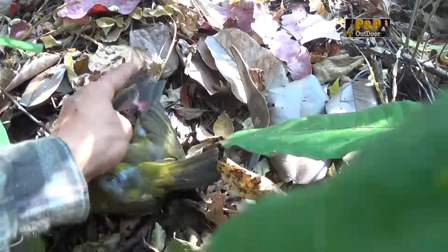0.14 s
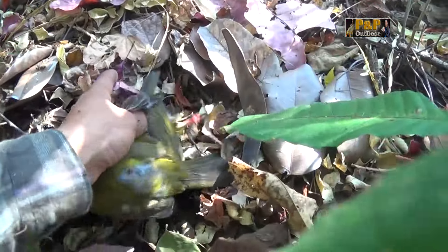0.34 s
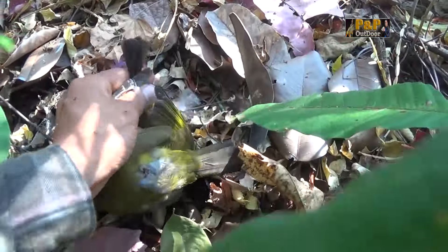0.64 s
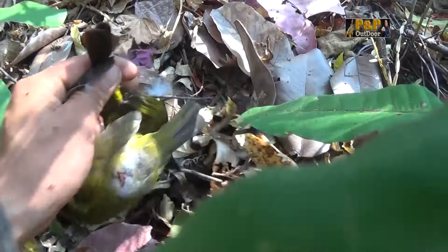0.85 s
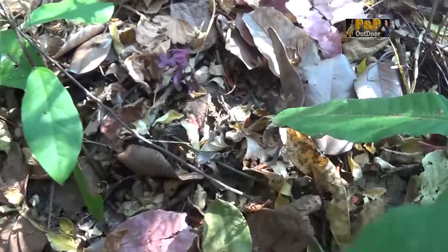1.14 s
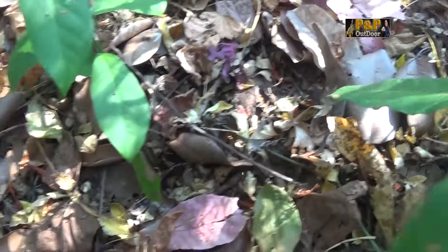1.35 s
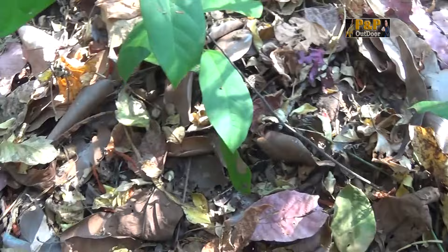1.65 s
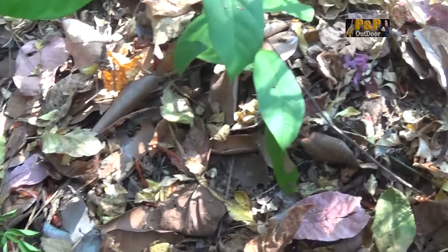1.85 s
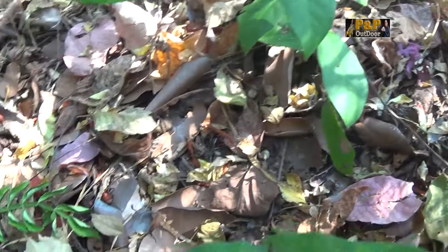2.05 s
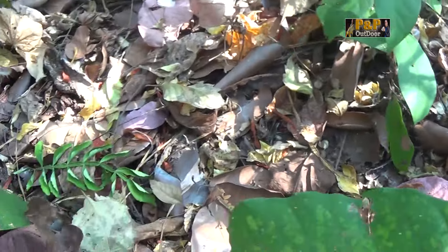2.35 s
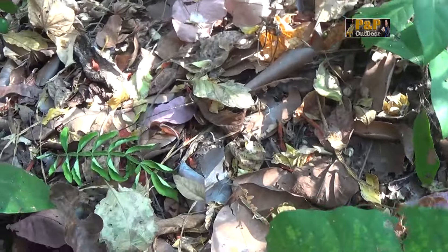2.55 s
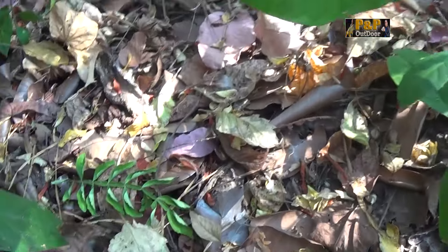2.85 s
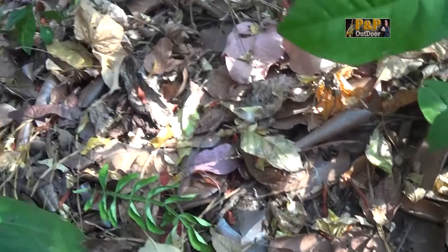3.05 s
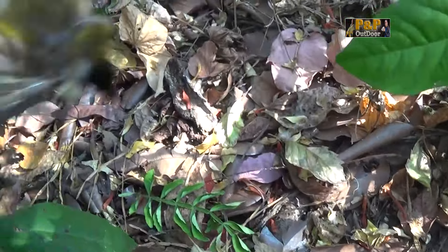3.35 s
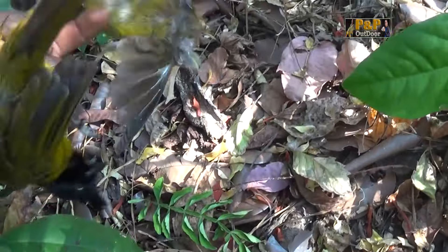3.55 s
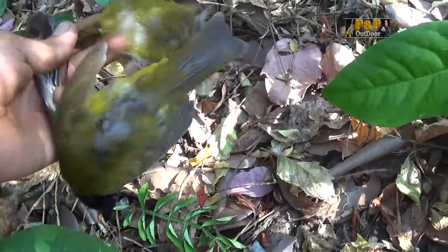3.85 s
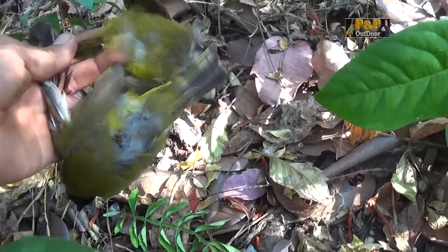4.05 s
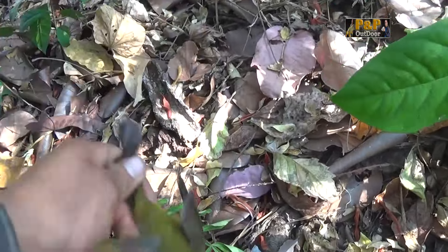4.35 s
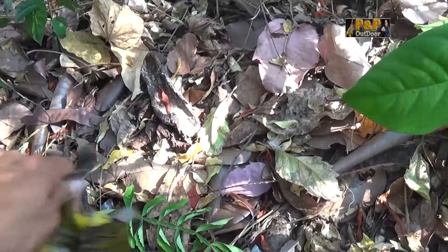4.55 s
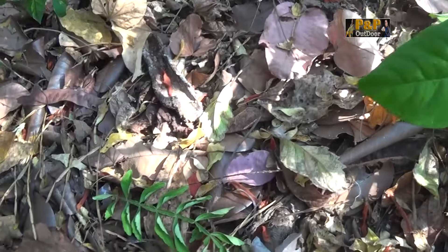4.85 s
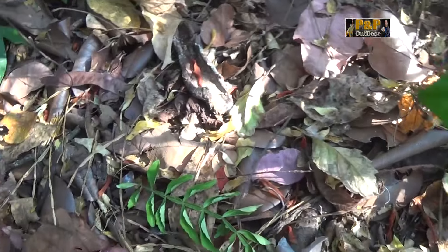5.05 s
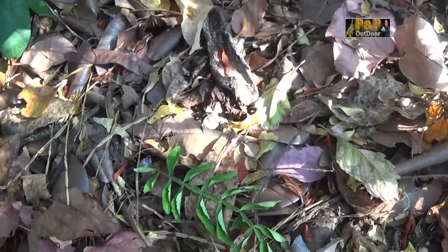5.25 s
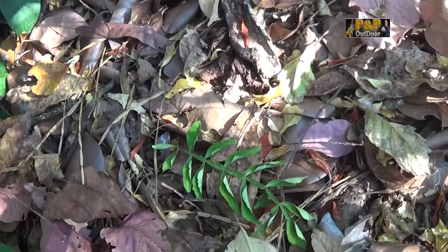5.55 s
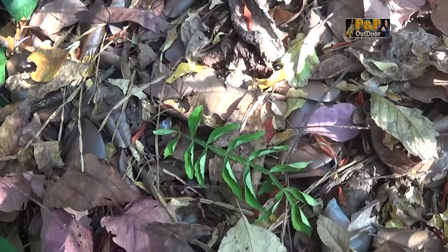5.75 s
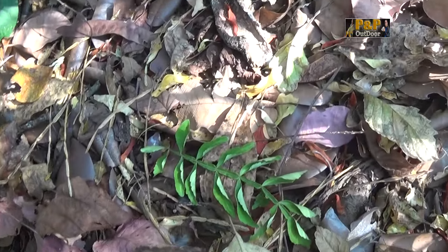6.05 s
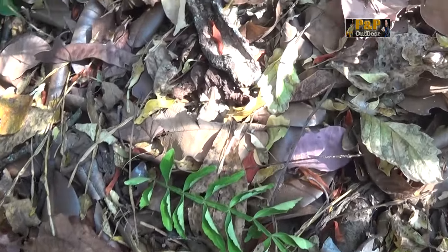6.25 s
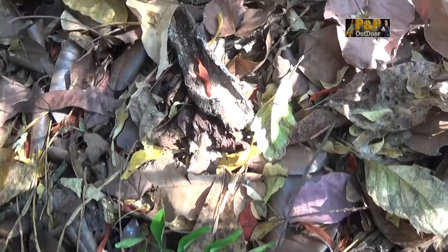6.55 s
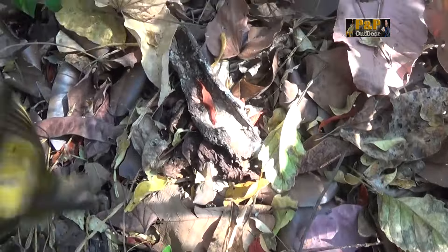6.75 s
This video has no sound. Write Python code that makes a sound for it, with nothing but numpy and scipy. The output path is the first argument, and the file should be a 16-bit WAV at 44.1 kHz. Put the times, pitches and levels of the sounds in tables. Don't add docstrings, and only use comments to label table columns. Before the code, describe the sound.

Dry leaves crackle and snap in irregular bursts close by, with early low thumps of fingers rubbing the camera, over a steady high cicada drone.

```python
import sys
import numpy as np
from scipy import signal
from scipy.fft import rfft, irfft
from scipy.io import wavfile
from scipy.ndimage import uniform_filter1d

SR = 44100
rng = np.random.default_rng(int(sys.argv[2]) if len(sys.argv) > 2 else 0)


def dump_mix(stems):
    frames = np.atleast_2d(stems).T
    limited = np.clip(frames, -1, 1)
    pcm = np.round(limited * 32767).astype(np.int16)
    wavfile.write(sys.argv[1], SR, pcm)


def makeup_ratio(level_db):
    decades = np.asarray(level_db, float) / 20
    return 10 ** decades


N = 304290
HZ, TIME = np.fft.rfftfreq(N, 1 / SR), np.arange(N) / SR

# time_s, left_minus_right_db
PLACE = [
    (0.0, 0.5),
    (1.42, 3),
    (1.63, 7),
    (2.46, -1),
    (3.09, 4.5),
    (4.63, 1.5),
    (4.8, 7),
    (5.65, 3),
    (6.84, 4.5),
    (6.9, 2),
]
# start_s, length_s, rubbing_db, resonance_hz, deep_boom_db
RUBS = [(0.0, 0.13, -22, 270, -32), (0.131, 0.053, -10.5, 276, -25), (0.19, 0.036, -17.5, 246, -23),
        (0.239, 0.071, -17, 282, -21), (0.308, 0.184, -35.5, 254, -16), (0.653, 0.028, -13, 310, -30),
        (0.699, 0.053, -18.5, 278, -1), (0.756, 0.058, -20.5, 332, -10.5), (0.804, 0.16, -24, 332, -32),
        (0.953, 0.05, -17.5, 383, -18), (1.133, 0.12, -34, 224, -7), (1.282, 0.23, -32, 250, -11),
        (1.458, 0.076, -38, 367, -15)]


def leaves():
    # pitch_hz, level_db
    crisp_tone = [(400, -64), (1500, -28), (3000, -1.5), (5000, -1.5), (7500, 1.5), (10500, 4.5),
                  (13000, 1.5), (15000, -8), (16500, -14)]
    coarse_tone = [(60, -60), (300, -5.5), (560, -3.5), (850, -1), (1500, 3), (2500, 3.5), (4000, -1),
                   (6000, 5), (9000, -7), (14000, -12.5)]
    scuff_tone = [(30, -31), (70, -3.5), (200, -1.5), (400, 0), (800, -4), (1400, -41), (3000, -48)]
    # pitch_hz, level_db
    off_mic = [(60, -5.5), (190, -9.5), (400, -6), (800, -5.5), (3000, -8)]

    shared = slips(30, 0.0039, 0.75)
    crisp_clumps = shared * slips(41, 0.045, 0.73)
    crisp = crackle(crisp_clumps, 900, 3.6, 0.00098, -0.69, crisp_tone, 3400, 21700)
    coarse_clumps = shared * slips(28, 0.035, 0.28)
    coarse = crackle(coarse_clumps, 800, 1.77, 0.0014, -0.72, coarse_tone, 820, 4740)
    scuff = crackle(shared, 350, 5.0, 0.0044, -0.32, scuff_tone, 184.6, 1160)

    litter = stirring(0.15, 0) * crisp + stirring(0.049, 0.9) * coarse
    ground = stirring(-8.5, 1.83) * scuff
    litter = litter + [colour(channel, off_mic) for channel in ground]
    brushing = rubbing(-7.5) * scuff[0]
    return spread(*litter, curves(PLACE)[0]) + ports(brushing)


def stirring(base_db, per_weight):
    # time_s, effort_db, weight_db (how much coarse litter gives way)
    shuffle = [(0.0, -32, 9.5), (0.35, -24.5, -5.5), (0.56, -35, 0.5), (1.02, -36, 5), (1.73, -24, 1.5),
               (2.25, -29.5, 2), (2.38, -44.5, 7), (3.54, -31.5, 3), (3.78, -26, 0), (3.98, -34, -1),
               (4.38, -33.5, -4.5), (4.88, -32.5, 4.5), (5.17, -30.5, 5), (5.5, -30.5, 0), (5.79, -43, -1),
               (5.96, -40, 2.5), (6.4, -33, -0.5), (6.9, -30.5, 2.5)]
    # start_s, length_s, effort_db, weight_db, swell_by_end_db
    sweeps = [(0.042, 0.065, -30, 5.5, -1.5), (0.191, 0.09, -27.5, 7, 1.5), (0.6, 0.24, -33.5, 1, 1),
              (0.93, 0.048, -33, -4, 3), (1.181, 0.15, -29, 5.5, 2), (1.337, 0.076, -39.5, 11.5, 7.5),
              (1.516, 0.36, -60, 19, 8.5), (2.196, 0.18, -21.5, -2, -3.5), (2.38, 0.33, -23.5, -5, -1.5),
              (2.79, 0.14, -31.5, -4, 6.5), (2.956, 0.36, -25.5, 0.5, -2.5), (3.608, 0.078, -21, -5.5, 8),
              (3.703, 0.038, -11, -5.5, 1.5), (3.76, 0.07, -25, -4.5, 8), (3.909, 0.035, -24, -6.5, 6),
              (3.963, 0.078, -12.5, -8, -0.5), (4.073, 0.014, -20.5, -6.5, 2.5),
              (4.148, 0.049, -25.5, -6, 5.5), (4.22, 0.074, -23, -6, 2), (4.88, 0.12, -28, 3, 3),
              (4.98, 0.16, -18.5, -4, -7.5), (5.098, 0.042, -29.5, 5.5, 2), (5.226, 0.073, -19, 3, -8.5),
              (5.492, 0.12, -32.5, -4, 3.5), (6.164, 0.16, -31, 0, -4), (6.451, 0.19, -35.5, 5, 4)]
    # start_s, effort_db, weight_db
    flicks = [(0.338, -5.5, 3.5), (0.516, -5, -6.5), (1.2815, -6, -8), (1.5753, -17, -2),
              (1.6581, -6.5, -6), (0.92, -11, -9), (1.0434, -20, 2), (2.311, 1.5, -11), (2.6894, -4, -3.5),
              (2.7487, -6.5, -5), (2.8724, -18, -17), (3.155, -15, 6), (3.455, -10, -1),
              (3.589, -0.5, -2.5), (3.864, 2.5, -8), (3.874, 3.5, -6), (4.3271, -9, -5), (4.576, -4.5, -19),
              (4.6688, -10, -10), (4.6994, -20, 3), (5.2769, -3.5, -12), (5.3333, -5.5, -2),
              (5.4246, -11, -2), (5.659, -11.5, -4), (6.325, -15, -7), (6.4894, -11, -14),
              (6.5755, -22, -8)]
    flick_s, flick_db, flick_swell_db = 0.008, -17, 1.5
    rise_db_per_s, fall_db_per_s = 902, 450

    effort_db, weight_db = curves(shuffle)
    short = [(s, flick_s, db + flick_db, weight, flick_swell_db) for s, db, weight in flicks]
    rows = np.array(sweeps + short)
    hit_db = rows[:, 2] + per_weight * rows[:, 3]
    hits = strokes(rows, hit_db, rise_db_per_s, fall_db_per_s, rows[:, 4:])
    return makeup_ratio(base_db) * np.hypot(hits, makeup_ratio(effort_db + per_weight * weight_db))


def slips(per_s, settle_s, depth):
    starts = rng.random(N) * (rng.random(N) < per_s / SR)
    settle = signal.lfilter([1], [1, -np.exp(-1 / (settle_s * SR))], starts)
    return 1 + depth * np.tanh(0.62 * evened(settle))


def crackle(clumps, per_s, spread_db, ring_s, hiss_db, tone, low_hz, high_hz, count=10):
    size = makeup_ratio(spread_db * np.minimum(rng.exponential(1, N), 2.2))
    size = size * (rng.random(N) < per_s / SR) * clumps
    kind = rng.integers(0, count, N)
    t = np.arange(1024) / SR
    out = np.zeros((2, N))
    for leaf, hz in enumerate(np.geomspace(low_hz, high_hz, count)):
        fade = np.exp(-t / (ring_s * rng.uniform(0.42, 5.1)))
        shape = rng.standard_normal((2, 1024)) * fade
        ringing = np.array([resonate(channel, hz, 0.2 * hz) for channel in shape])
        shape = 0.91 * evened(shape) + 0.33 * evened(ringing)
        out += signal.oaconvolve((size * (kind == leaf))[None], shape, axes=1)[:, :N]
    faint = evened(clumps) * rng.standard_normal((2, N))
    out = evened(out) + makeup_ratio(hiss_db) * faint
    return evened(np.array([colour(channel, tone) for channel in out]))


def snaps():
    # time_s, peak_db, pitch_hz,
    # middle_part_db
    thin_breaks = [(0.1795, -8, 10000, -7), (0.2154, -9, 10200, -12), (0.3341, -16, 11200, -10),
                   (0.4833, -11, 9700, -13), (0.4986, -5, 12100, -21), (0.517, -6, 10300, -17),
                   (0.6858, -8, 10100, -11), (0.8265, -10, 7000, -16), (1.2815, -6, 9850, -4),
                   (1.5199, -1, 9300, -19), (1.5414, -14, 10700, -3), (1.6173, -4, 9030, -14),
                   (1.735, -21, 8160, -7), (1.849, -9, 9180, -7), (1.8786, -14, 7000, -6),
                   (1.88, -2.5, 12100, -15), (1.9323, -3, 9920, -14), (1.9766, -8, 10400, -10),
                   (2.0074, -8, 8000, -9), (2.071, -6, 7020, -12), (2.136, -13, 7750, -10),
                   (2.1755, -11, 8010, -13), (2.2189, -7, 8620, -3), (2.3088, -13, 12600, -14),
                   (2.406, -7, 8350, -14), (2.4237, -9, 11900, 9), (2.528, -3, 11000, -22),
                   (2.556, -5, 8800, -1), (2.5717, -5, 7400, -14), (2.6609, -5, 7000, -19),
                   (2.6757, -7, 11500, -20), (2.7495, -9, 9450, -10), (2.7831, 3, 10600, -29),
                   (2.807, -8, 11500, -14), (2.872, -6, 7640, -18), (3.0405, -5, 7200, -11),
                   (3.0769, -15, 7470, -7), (3.4426, -23, 10400, -7), (3.455, -9, 10500, -13),
                   (3.5677, -3, 7210, 2), (3.5932, -14, 11900, -7), (3.6348, -2, 7400, -17),
                   (3.8282, -3, 11400, -13), (3.8596, -4, 10400, -17), (3.907, -1, 9690, -22),
                   (3.9384, -5, 7710, -12), (4.0663, 1, 8240, -22),
                   (4.086, -1, 8000, -20), (4.1432, -12, 7100, -19), (4.1537, -6, 10200, -18),
                      (4.1537, -10, 13100, -25), (4.1624, -2, 10900, -24), (4.327, -11, 10500, -18),
                      (4.3483, -12, 7600, -13), (4.3888, -6, 9400, -2), (4.4055, -13, 10300, -19),
                      (4.4371, -16, 9950, -17), (4.4576, -9, 11600, 2), (4.521, -10, 8970, -11),
                      (4.5798, 2, 12000, -24), (4.6166, -8, 11900, -20), (4.669, -16, 11000, -13),
                      (4.715, -11, 7380, -24), (4.787, -18, 10900, -5), (4.856, -20, 7150, -9),
                      (4.9798, -22, 8780, -5), (5.0287, -4, 7420, -14), (5.2208, -7, 9950, -9),
                      (5.257, -4, 8410, -1), (5.2765, -3, 10200, -16), (5.3332, -5, 8700, -16),
                      (5.4253, -11, 8250, -15), (5.4924, -11, 9890, -19), (5.515, -5, 9900, -24),
                      (5.54, -10, 10300, -20), (5.5773, -6, 11100, -13), (5.582, -2, 8300, -9),
                      (5.6086, -9, 7900, -13), (5.6593, -14, 7310, -19), (5.7007, -8, 10900, -22),
                      (5.7846, -11.5, 10500, -12), (6.1901, -12, 9070, -13), (6.2256, -13, 10100, -5),
                      (6.2507, -8, 7260, -20), (6.324, -7, 8380, -19), (6.3497, -7, 7200, -15),
                      (6.3767, -13, 9610, -21), (6.5338, -14, 7050, -11), (6.574, -15, 7100, -11),
                      (6.672, -4, 7000, -11), (6.737, -13, 9800, -9), (6.8082, -13, 7870, -16),
                      (6.883, -21, 7440, -13),
                   (2.694, -8, 9200, -18), (3.8668, -11, 12200, -16), (3.874, 5.5, 11500, -17),
                 (4.0536, 0, 9850, -22), (4.1806, -1, 12300, -16), (4.411, -5, 10500, -10),
                 (4.479, -19, 11000, -15), (4.482, -22, 10000, -18), (4.092, -3, 9000, -18),
                 (4.487, -13, 7430, -7), (4.5704, -11, 13100, -23), (4.592, -9, 9220, -21),
                 (4.6874, -15, 7360, -17), (4.9924, -8, 7850, -10), (5.2254, -9, 7690, -9),
                 (5.75, -26, 10500, -15), (6.079, -15, 9000, -8), (6.105, -17, 11000, -15)]
    # time_s, peak_db, pitch_hz
    crunches = [(0.148, -2.5, 1070), (0.1615, -5, 1570), (0.1979, -14, 1620), (0.2743, -5, 2140),
                (0.3217, -13, 1640), (0.7142, -5.5, 2090), (1.278, 2, 1630), (1.3345, -6, 1980),
                (1.3903, -11, 1640), (1.5728, -13, 1280), (1.6786, -7, 2040), (1.7353, -17, 1760),
                (1.7557, -8, 1310), (1.8183, -5.5, 2830), (1.8785, -4, 1950), (2.0707, -9, 3640),
                (2.1096, -9, 3440), (2.136, -11, 3440), (2.2378, 1, 3760), (2.2628, -7, 1610),
                (2.4548, -3, 3740), (2.5721, -12, 3270), (2.9592, -16, 2090), (3.0944, -10, 2010),
                (3.183, -11, 2580), (3.496, -12, 1680), (3.5354, -13, 2160), (3.5815, -6, 2890),
                (3.595, -4, 2670), (3.6574, -8, 3220), (3.7065, -6, 3660), (3.805, -3, 4690),
                (3.8616, -13, 3510), (3.9666, 3, 4800), (4.0407, -5, 3200), (4.1679, -20, 4420),
                (4.1835, -10, 4400), (4.2757, -12, 3270), (4.349, -12, 4730), (4.5218, -10.5, 4680),
                (4.5456, -15, 2200), (4.5795, -11, 4500), (4.6713, -13, 2790), (4.805, -17, 4180),
                (4.8204, -8.5, 1970), (4.9851, -1, 3050), (5.2215, -7, 2480), (5.2703, -3.5, 3390),
                (5.6255, -15, 2710), (5.9933, -14, 2050), (6.4916, -10, 4600), (6.535, -10, 4800),
                (6.5786, -19, 1900), (6.6496, -9.5, 4400), (6.672, -7, 3960), (6.6982, -16, 2090),
                (0.2987, -7, 2270), (0.9604, -14, 1000), (0.976, -11, 2180), (1.1278, -14, 2500),
             (1.1827, -11, 2380), (1.215, -7, 1930), (1.284, -3.5, 1600), (1.347, -2, 2500),
             (1.5858, -3.5, 1620), (1.6478, -7, 1360), (1.7665, -7, 3680), (2.2464, -6, 4900),
             (2.9957, -10, 1920), (3.0847, -8, 2020), (3.191, -7, 1950), (3.2154, -16, 5070),
             (4.9918, -5, 3020), (5.113, -11, 1840), (5.225, -11, 2390), (5.2764, -6, 2860),
             (5.339, -17, 2890)]
    # time_s, peak_db, pitch_hz
    twigs = [
        (3.0392, -4, 1280),
        (3.0945, -13, 1700),
        (3.86, -10, 3500),
        (4.5804, -11, 4000),
        (5.2203, -13, 2400),
        (5.992, -19.5, 2000),
        (6.349, -15, 2400),
    ]
    # time_s, peak_db, pitch_hz
    thuds = [(1.583, -13, 493), (1.674, -6, 1270), (1.806, -12, 780), (2.136, -15, 522),
             (2.261, -11.5, 1280), (2.316, -11, 1280), (2.955, -17, 440), (3.038, -22, 1010),
             (3.084, -13, 1160), (3.496, -17, 762), (3.582, -25, 1010), (3.632, -16, 996),
             (3.656, -19, 980), (3.72, -14, 1130), (3.861, -14, 1200), (4.184, -14, 1060),
             (4.22, -23, 1180), (4.348, -16, 1210), (4.762, -20, 493), (4.915, -13, 574),
             (4.964, -12, 1010), (5.221, -6, 1150), (5.276, -7, 1060), (5.623, -18.5, 574),
             (6.456, -18, 926), (6.577, -18, 543), (6.698, -18, 902)]
    # time_s, peak_db, pitch_hz
    slaps = [
        (3.567, -16, 851),
        (3.583, -19, 1050),
        (3.595, -17, 864),
        (3.621, -23, 1030),
        (3.632, -15, 991),
        (3.657, -21, 980),
        (3.689, -22, 923),
        (3.707, -2.5, 848),
        (3.722, -4, 1040),
    ]

    mid = np.zeros(N)
    for s, peak_db, hz, middle_db in thin_breaks:
        tick = 0.96 * burst(hz, 0.15 * hz, 0.0011, 0.82) + 0.93 * burst(11600, 4000, 0.00077, 1.0)
        tick = signal.lfilter(*signal.butter(2, 0.32 * hz, "high", fs=SR), tick)
        middle = makeup_ratio(middle_db - 3.0) * burst(4100, 2200, 0.0008, 0.77)
        add(mid, s, makeup_ratio(peak_db - 2.0) * (tick + middle))
    for s, peak_db, hz in crunches:
        body = 0.88 * burst(hz, 500 + 0.036 * hz, 0.0035, 0.54)
        edge = 0.5 * burst(3200, 2900, 0.0018, 1.0)
        add(mid, s, makeup_ratio(peak_db - 1.5) * (body + edge))
    for s, peak_db, hz in twigs:
        add(mid, s, makeup_ratio(peak_db + 5.5) * burst(hz, 1.2 * hz, 0.0023, 0.33))
    for s, peak_db, hz in thuds + slaps:
        add(mid, s, makeup_ratio(peak_db - 5.5) * burst(hz, 0.15 * hz, 0.0019, 0.61))
    mid = signal.sosfilt(signal.butter(2, 250, "high", fs=SR, output="sos"), mid)
    bounce = 0.21 * np.roll(mid, 9)
    return spread(mid, bounce, curves(PLACE)[0])


def burst(hz, width, fall_s, rattle):
    t = np.arange(800) / SR - 0.0009
    dying = np.exp(-abs(t) / np.where(t < 0, 0.0001, fall_s))
    dying = dying + 0.27 * (t > 0) * np.exp(-t / (4 * fall_s))
    crack = 2.8 * np.exp(-(t / 0.00003) ** 2)
    x = resonate(rattle * rng.standard_normal(800) * dying + crack, hz, width)
    return x / abs(x).max()


def grip():
    # pitch_hz, level_db
    shell_tone = [(60, -5), (150, -1), (260, 7), (450, 7.5), (900, 1.5), (1150, 0.5), (2500, -5.5),
                  (5000, -22.5)]
    # time_s, peak_db, pitch_hz
    knocks = [
        (0.151, 6, 246),
        (0.269, 3, 420),
        (0.652, -11, 260),
        (0.721, 0, 273),
        (0.798, 3, 355),
        (0.938, -13, 388),
        (0.997, 8, 410),
        (1.41, 2.5, 205),
    ]

    start, length, _, hz, deep_db = np.transpose(RUBS)
    hz = np.interp(TIME, start + length / 2, hz)
    skin = rng.standard_normal(N) * makeup_ratio(4.1 * wander(12, 120))
    ringing = resonate(resonate(skin, hz, 66), hz, 70)
    shell = evened(colour(skin, shell_tone)) + 0.67 * evened(ringing)
    boom = evened(resonate(resonate(skin, 137.5, 3.9), 110, 55))
    x = rubbing(-2.05) * shell + rubbing(deep_db - 2.0) * boom

    t = np.arange(2000) / SR
    onset = 1 - np.exp(-t / 0.0043)
    click = 0.89 * np.sin(2 * np.pi * 820 * t) * np.exp(-t / 0.01)
    for s, peak_db, knock_hz in knocks:
        fade = makeup_ratio(peak_db - 3.5 - 60 * t / 0.03)
        add(x, s, fade * onset * (np.sin(2 * np.pi * knock_hz * t) + click))
    return ports(x)


def rubbing(extra_db=0):
    rise_db_per_s, fall_db_per_s, swell_db = 469, 1100, -1.3
    return strokes(RUBS, np.array(RUBS)[:, 2] + extra_db, rise_db_per_s, fall_db_per_s, swell_db)


def cicadas():
    # time_s, chorus_db
    chorus = [(0, -30.5), (.6, -21), (1.2, -22.5), (1.8, -20.5), (2.75, -19.5), (2.78, -24), (3.45, -27.5),
              (3.72, -23.5), (4.1, -27), (5.0, -28.5), (5.6, -31), (6.9, -31)]
    # pitch_hz, width_hz, level_db
    tymbals = [(5777, 590, 12), (6010, 260, 7.5), (6360, 1070, 11)]

    pulsing_db = 1.1 * wander(17.0, 170) + 2.35 * wander(1.5, 1.8)
    clicks = rng.standard_normal((2, N)) * makeup_ratio(pulsing_db)
    bodies = sum(makeup_ratio(db) / (1 + (2 * (HZ - hz) / width) ** 2) for hz, width, db in tymbals)
    drone = evened(irfft(rfft(clicks) * bodies, N))
    return makeup_ratio(curves(chorus)[0] - 1.0) * spread(*drone, 2.3)


def air():
    # pitch_hz, level_db
    hush_tone = [(18, -56), (30, -10), (355, -11.5), (1190, -40), (1670, -32), (2540, -50), (4300, -17),
                 (6050, 14.5), (7670, -10), (16000, -53)]
    # pitch_hz, level_db
    circuit = [(15734, -58)]
    hush_db = -32

    hush = evened(np.array([colour(channel, hush_tone) for channel in rng.standard_normal((2, N))]))
    whine = sum(makeup_ratio(db) * np.sqrt(2) * np.sin(2 * np.pi * f * TIME) for f, db in circuit)
    return makeup_ratio(hush_db) * spread(*hush, 0.6) + whine


def spread(mid, side, pan_db):
    # pitch_hz, side_minus_mid_db
    diffuse_width = [(60, -22), (110, -25), (200, -17), (380, -19.5), (700, -12), (1290, -16), (2380, -14),
                     (4400, -8), (8120, -10), (11500, -23), (15000, -34)]
    # pitch_hz, level_db
    lean = [(100, -46), (500, -4), (1500, 1), (4000, 2.5), (8000, -12), (13000, -11)]

    leaning = mid * np.tanh(pan_db * np.log(10) / 40)
    side = colour(side, diffuse_width) + colour(leaning, lean)
    return np.array([mid + side, mid - side])


def ports(x):
    # pitch_hz, lead_radians
    port_lead = [(60, .3), (200, 0.76), (430, 1.53), (1000, 1.86), (2400, 2.43), (5000, 0.15)]
    turn = np.exp(0.5j * read(port_lead))
    return irfft(rfft(x) * np.array([turn, 1 / turn]), N)


def strokes(rows, db, rise, fall, swell_db):
    t = TIME[::64]
    start, length = np.array([row[:2] for row in rows]).T[:, :, None]
    late = t - start
    shape_db = rise * np.minimum(late, 0) - fall * np.maximum(late - length, 0)
    shape_db = shape_db + swell_db * np.clip(late / length, 0, 1)
    power = (makeup_ratio(db[:, None] + shape_db) ** 2).sum(0)
    return np.interp(TIME, t, np.sqrt(power))


def resonate(x, hz, width):
    turn = np.exp(2j * np.pi * np.cumsum(hz * np.ones(len(x))) / SR)
    r = np.exp(-np.pi * width / SR)
    return 2 * (turn * signal.lfilter([1 - r], [1, -r], x / turn)).real


def wander(low_hz, high_hz):
    band = (HZ > low_hz) / (1 + (HZ / high_hz) ** 2)
    return evened(irfft(rfft(rng.standard_normal(N)) * band, N))


def evened(x):
    return x / np.sqrt(np.mean(x ** 2) + 1e-20)


def read(points):
    f, value = np.transpose(points)
    return np.interp(np.log(HZ + 1), np.log(f + 1), value)


def colour(x, points):
    return irfft(rfft(x) * makeup_ratio(read(points)), N)


def curves(rows):
    s, *columns = np.transpose(rows)
    return [np.interp(TIME, s, column) for column in columns]


def add(mix, s, sound):
    part = mix[round(s * SR):][:len(sound)]
    part += sound[:len(part)]


def scene():
    return leaves() + cicadas() + grip() + air() + snaps()


def top_cut(x):
    return signal.sosfilt(signal.butter(12, 16670, fs=SR, output="sos"), x)


def record(dry):
    edge_hz, recovery_db_per_s = 15900, 350
    peak_db = 20 * np.log10(abs(dry).max(0) + 1e-9)
    fall = recovery_db_per_s * TIME
    held_db = np.maximum.accumulate(peak_db + fall) - fall
    over_db = np.maximum(held_db + 2.5, 0)
    dip_db = 0.75 * uniform_filter1d(over_db, 60, origin=29)
    soft = 0.96 * np.tanh(dry / makeup_ratio(dip_db) / 0.96)
    edge = signal.firwin(511, edge_hz, window=("kaiser", 9), fs=SR)
    return top_cut(signal.oaconvolve(soft, edge[None], "same", axes=1))


dry = scene()
out = record(dry)
dump_mix(out)
```